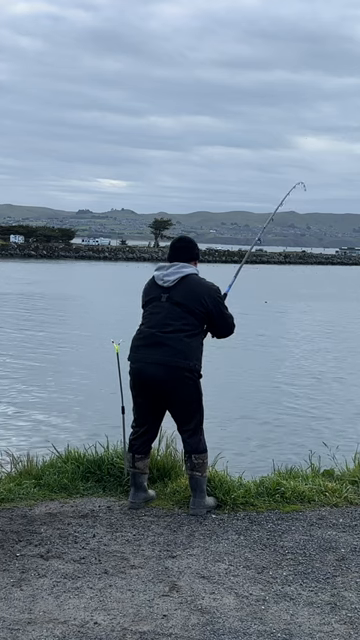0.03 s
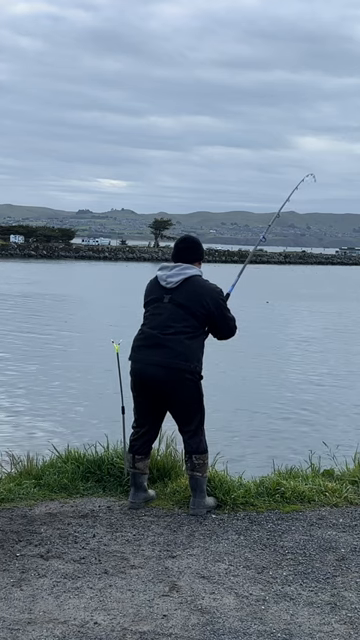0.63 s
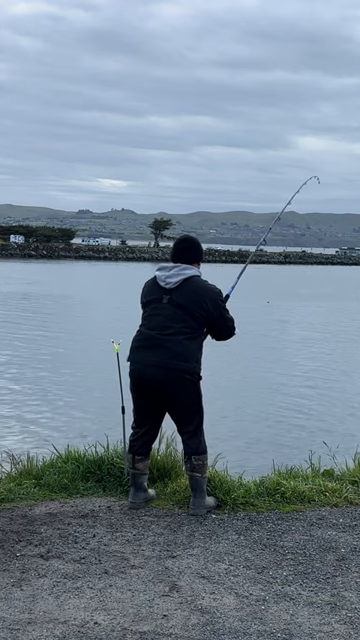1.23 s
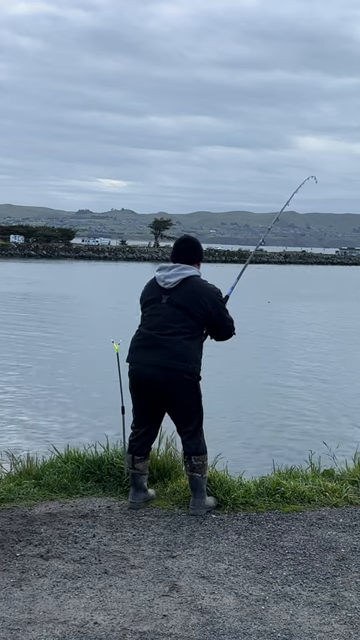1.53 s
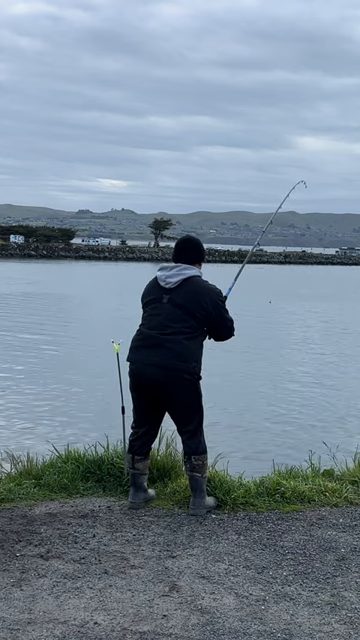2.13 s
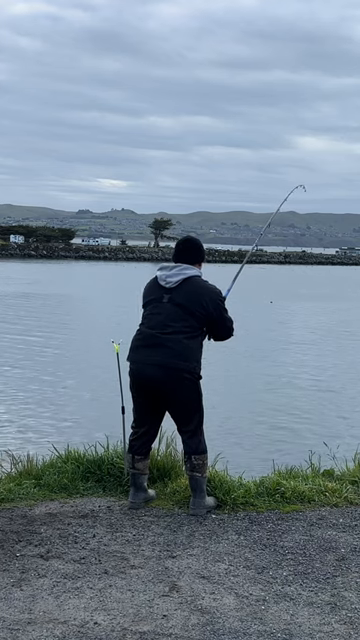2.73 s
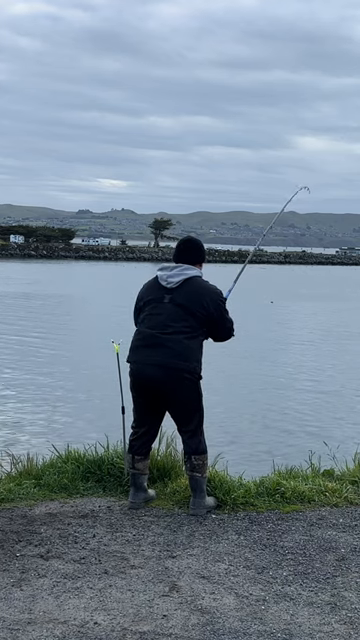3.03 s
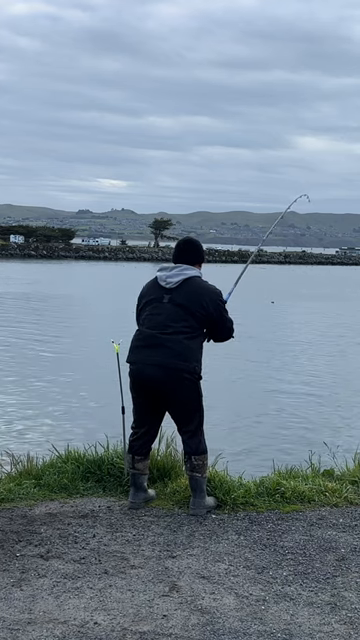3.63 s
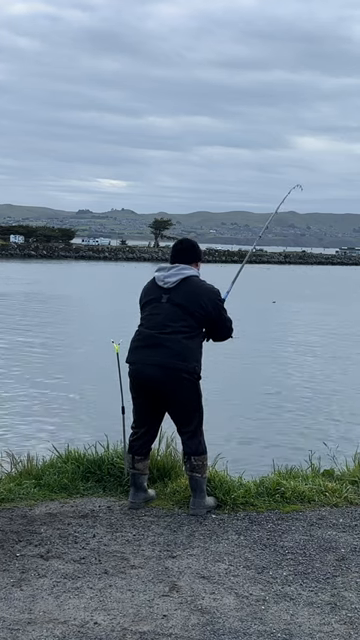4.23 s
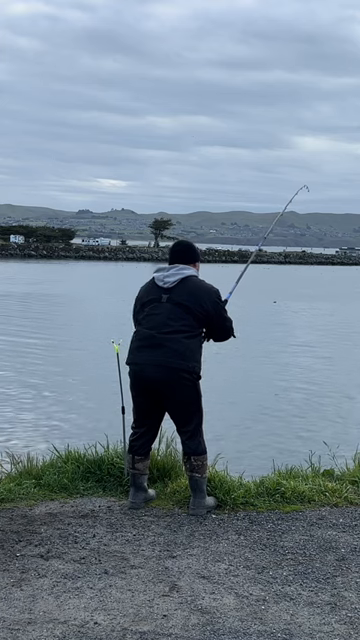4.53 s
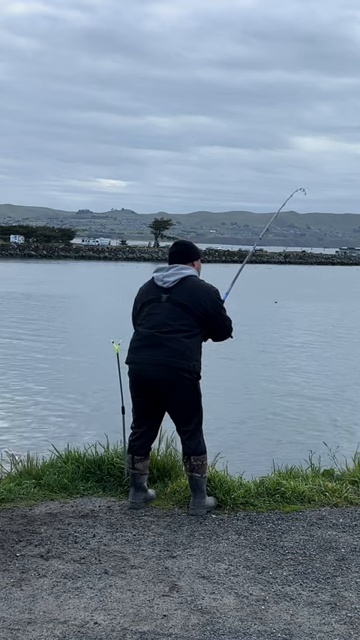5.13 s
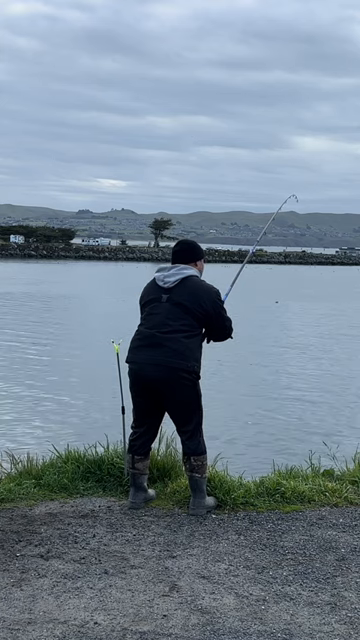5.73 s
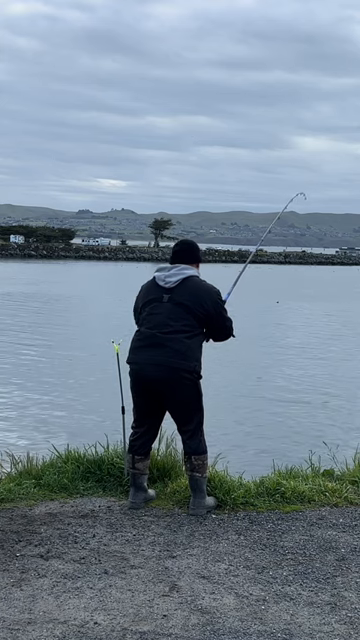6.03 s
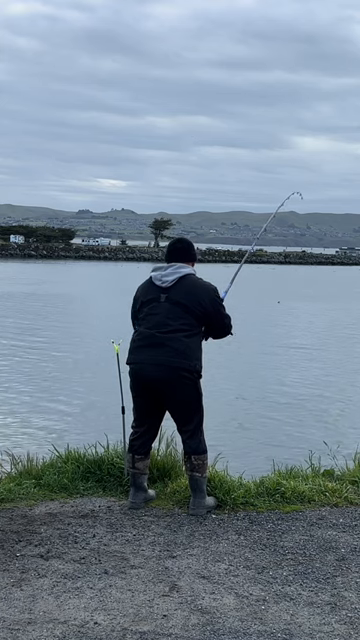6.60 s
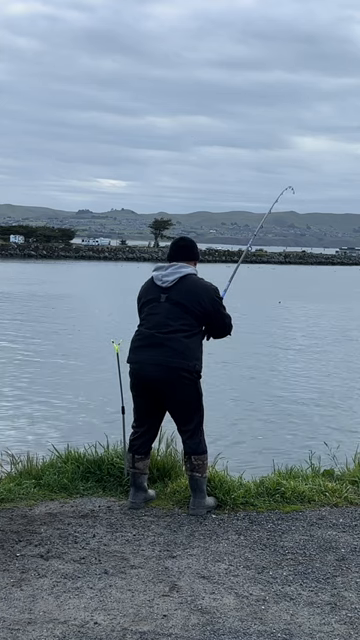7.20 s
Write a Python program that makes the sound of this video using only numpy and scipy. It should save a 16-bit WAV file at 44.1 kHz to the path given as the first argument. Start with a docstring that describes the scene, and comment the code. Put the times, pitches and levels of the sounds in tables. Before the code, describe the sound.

Low wind rumbles on the microphone from the start, over a soft, steady wash of air by open water. Throughout, a fishing reel is wound with a faint gear whine that wavers up and down several times a second, with a few tiny ticks. A faint, distant low moan comes at about 1.2 seconds. Short wind puffs hit between 1.5 and 3 seconds and again near 3.9; the rumble dips around 3.1 and 4.3. At 2.2 seconds a foghorn sounds one prominent, almost pure, medium-pitched tone lasting a second, with a short lingering tail. From 4.5 seconds a sparrow on the left sings two clear notes, then high chips and buzzes from 5 to 6.2, a quick rising trill at 6.4 and a last buzz. The reel's handle knocks lightly near 6.9 seconds, and wind and winding continue until about 7.5.

```python
"""On a grassy shore an angler winds a spinning reel, whose gears whine up and down with each push
of the crank. Wind rumbles and puffs on the microphone, and a foghorn sounds one almost pure tone
across the bay. A sparrow off to the left sings short notes, buzzes and a trill;
other birds call from far away, over the soft wash of the bay."""
import sys
import numpy as np
from scipy import signal
from scipy.fft import rfft, irfft, next_fast_len
from scipy.io import wavfile
from scipy.ndimage import uniform_filter1d, map_coordinates

SR = 44100
rng = np.random.default_rng(int(sys.argv[2]) if len(sys.argv) > 2 else 0)


def wrap_up_sound(samples):
    """Save the sound to the file named by the first command line argument, as 16-bit audio."""
    columns = np.atleast_2d(samples).T
    # keep every value between -1 and 1, then stretch to whole-number steps
    tamed = np.clip(columns, -1, 1)
    steps = np.round(tamed * 32767).astype(np.int16)
    wavfile.write(sys.argv[1], SR, steps)


N = 328986
TIME = np.arange(N) / SR


# Pushes of the crank, two a turn, and how often the gear teeth meet during and after each one.
# Columns: fastest_at_s, fastest_hz, slowest_hz, level_db
CRANK_PUSHES = [(0.011, 515.4, 452, -56.5), (0.115, 494, 419, -60.5), (0.247, 510, 391.7, -59),
                (0.363, 578.4, 460, -60), (0.464, 496, 325.3, -60.5), (0.631, 484, 433.5, -58),
                (0.736, 460.4, 391.6, -62), (0.912, 538, 474, -59.5), (1.004, 576, 439, -59),
                (1.121, 509, 398.7, -59.5), (1.264, 486.7, 460.6, -57), (1.369, 497.4, 410.3, -60.0),
                (1.552, 483, 473, -59.5), (1.639, 578, 387, -59), (1.766, 448.6, 351, -60),
                (1.94, 544.3, 531.5, -61.5), (2.012, 641.6, 407, -60.0), (2.164, 516, 452.3, -59),
                (2.279, 537, 418, -61), (2.401, 481.6, 430, -59), (2.538, 520, 483, -61.5),
                (2.632, 572, 302.2, -61), (2.819, 493.7, 459, -62.5), (2.93, 533.3, 394.3, -63),
                (3.046, 496, 354, -62.5), (3.197, 462.7, 420.4, -62), (3.33, 590.4, 517.3, -62.5),
                (3.412, 550.6, 455, -61), (3.568, 534, 470.5, -63.5), (3.664, 530, 378, -61.5),
                (3.81, 436, 361.5, -63), (3.965, 452.5, 419.5, -63), (4.066, 485, 344, -58.5),
                (4.258, 447.3, 393.3, -65.5), (4.387, 486.4, 372, -64.5), (4.526, 459, 392, -63.5),
                (4.682, 459, 425.7, -68.5), (4.778, 514.6, 349, -64.5), (4.956, 458.6, 389, -67),
                (5.09, 426, 379.6, -64), (5.229, 459, 416, -65), (5.368, 482, 377.4, -64.5),
                (5.527, 488, 481.7, -62), (5.618, 523.7, 424.7, -57.5), (5.767, 485.4, 415.6, -63),
                (5.88, 488, 369, -62), (6.04, 526, 471, -62.5), (6.139, 491, 421, -62),
                (6.27, 551, 415, -59.5), (6.408, 485.5, 400.6, -63.5), (6.547, 477, 369.6, -62),
                (6.674, 488, 409, -64), (6.834, 509, 501.6, -60), (6.917, 576.5, 294.6, -62),
                (7.114, 501.6, 442.6, -62.5), (7.204, 467.4, 369.5, -63.5), (7.368, 462, 410, -59),
                (7.48, 478, 425, -63)]

def crank(unsteady=.007):
    """The gears speed up with each push and slow down halfway to the next; gives their rate and level."""
    fastest_at_s, fastest_hz, slowest_hz, level_db = np.transpose(CRANK_PUSHES)
    half_pushes = np.interp(TIME, fastest_at_s, 2 * np.arange(len(fastest_at_s)))
    eased = np.floor(half_pushes) + (1 - np.cos(np.pi * (half_pushes % 1))) / 2
    turning_points = np.ravel([fastest_hz, slowest_hz], "F")   # fast, slow, fast, slow...
    tooth_hz = np.interp(eased, np.arange(len(turning_points)), turning_points)
    return tooth_hz * (1 + unsteady * drift(22.16)), np.interp(TIME, fastest_at_s, level_db)


# The tones that make up the whine. Columns: multiple_of_tooth_rate, gain_db
GEAR_TONES = [(2, -2.5), (3, -3), (4, -0.5), (5, -12.5), (6, -13.5), (7, -18.5), (8, -14.5)]
# How the reel's housing boosts or weakens each pitch. Columns: pitch_hz, gain_db
HOUSING_COLOUR = [(700, -12.5), (1020, 2), (1250, -4.5), (1460, 4), (1570, 1.5), (1700, 6), (2150, 3.5),
                  (2340, -6.5), (2540, 4), (2690, -11), (2850, 0), (3150, -8.5), (3900, -7.5),
                  (5000, -12.5)]

def gear_whine(tooth_hz, jitter=0.009, rasp=0.0085, rough=0.34, scratch=0.19, even_s=0.1):
    """Meeting teeth make a stack of tones; uneven teeth make each flicker, the strongest one least."""
    chatter = rms_one(band(rng.standard_normal(N), 82, 400))
    phase = 2 * np.pi * np.cumsum(tooth_hz * (1 + jitter * drift(52.9) + rasp * chatter)) / SR
    whine = 0
    for multiple, db in GEAR_TONES:
        from_strongest = abs(multiple - 4)
        flicker_db = (6 if from_strongest else 5) * np.minimum(drift(22), 1)
        level = from_db(db + at_hz(HOUSING_COLOUR, multiple * tooth_hz) + flicker_db)
        blur = scratch * (1 + from_strongest) * drift(88)
        whine = whine + level * (1 + rough * drift(110)) * np.sin(multiple * phase + blur)
    # the tones compete for the power that the push supplies
    return whine / np.sqrt(uniform_filter1d(whine ** 2, int(even_s * SR)) + 1e-12)


# The hiss of the gears and the line rubbing. Columns: pitch_hz, gain_db
RUB_COLOUR = [(500, -16), (1200, 4.5), (2500, 0), (3400, -9), (6000, -38)]

def reel(whine_boost_db=2.0, rub_db=-69.0, rub_follows=0.43, echo_db=-12.0):
    """The gears whine, the rubbing swells with each push, and echoes from the bank smear the sound."""
    tooth_hz, push_db = crank()
    whine = from_db(push_db + whine_boost_db) * gear_whine(tooth_hz)
    load = from_db(rub_follows * (push_db - push_db.mean()))
    rub = rms_one(coloured(banded_noise(RUB_COLOUR, patchy_db=4.5), HOUSING_COLOUR))
    winding = place(whine, lag_ms=0.02, left_db=0.2) + load * from_db(rub_db) * rub
    return winding + from_db(echo_db) * scatter(winding[0], ring_s=0.12, first_s=0.0014)


# Ticks inside the reel. Columns: start_s, level_db
REEL_TICKS = [(0.171, -78.5), (1.2849, -84), (1.3174, -80.5), (2.254, -85), (3.423, -89), (3.962, -84),
              (4.245, -83), (4.7241, -71.5), (6.85, -81.5)]

def reel_ticks(boost_db=13.5, ring_s=0.016, fine_db=-91.5, fine_until_s=4.3, fine_count=30):
    """The mechanism gives tiny bright ticks, and finer ones at random while it is wound hard."""
    ticks, age = np.zeros(N), TIME[:SR // 10]
    fine = [(fine_until_s * when, fine_db + 5 * force) for when, force in rng.random((fine_count, 2))]
    for start_s, db in list(REEL_TICKS) + fine:
        level = from_db(db + boost_db - 60 * age / ring_s)
        ticks[round(start_s * SR):][:len(age)] += level * rng.standard_normal(len(age))
    return band(ticks, low_hz=3500, high_hz=14000)


# Knocks of the reel's handle. Columns: start_s, level_db
HANDLE_KNOCKS = [(4.724, -66.5), (6.848, -51.5), (6.92, -60)]
# The tones the handle rings with. Columns: pitch_hz, gain_db, ring_s (time to fade by 60 dB)
HANDLE_TONES = [(1170, 6.5, 0.0098), (1680, -11, .025), (2850, -8.5, 0.051), (3900, -5.5, 0.029)]

def handle_knocks():
    """Each knock sets the handle ringing for a moment, duller than the ticks."""
    knocks, age = np.zeros(N), TIME[:SR // 10]
    for start_s, db in HANDLE_KNOCKS:
        for hz, gain_db, ring_s in HANDLE_TONES:
            level = from_db(db + gain_db + rng.normal(0, 1.5) - 60 * age / ring_s)
            knocks[round(start_s * SR):][:len(age)] += level * np.sin(2 * np.pi * hz * age)
    return knocks


# How the breeze rises and falls. Columns: time_s, level_db
BREEZE = [(0.0, -51.5), (1.45, -51), (2.4, -52), (2.75, -54.5), (3.15, -65.5), (3.65, -51.5), (4.15, -62.5),
          (4.45, -63.5), (4.8, -52.5), (7.46, -51.5)]
# The wind's low rumble. Columns: pitch_hz, gain_db
RUMBLE_COLOUR = [(20, -41), (32, -31), (45, -10.5), (62, -6), (80, 1), (115, -2.5), (150, -15), (200, -21),
                 (300, -25.5), (500, -40.5)]
# Puffs on the microphone. Columns: middle_s, length_s, level_db, top_hz
WIND_PUFFS = [(1.549, 0.055, -40, 131), (1.691, 0.11, -39.5, 144), (2.044, 0.024, -32, 183),
              (2.091, 0.49, -42.5, 162), (2.599, 0.091, -37, 231), (2.9, 0.2, -49.5, 241),
              (3.876, 0.073, -44, 162), (3.953, 0.019, -39, 260)]

def wind(rumble_gain_db=1.5, drone_gain_db=-1.5):
    """A low rumble with a droning centre follows the breeze, and short puffs hit the microphone."""
    eddies = rng.standard_normal(N) + .33 * rng.standard_normal((2, N))   # mostly alike on both sides
    drone = from_db(drone_gain_db) * rms_one(band(eddies, 56.05, 65.8))
    rumble = from_db(rumble_gain_db) * banded_noise(RUMBLE_COLOUR, patchy_db=2.0)
    breeze_db = np.interp(TIME, *np.transpose(BREEZE))
    out = from_db(breeze_db) * (rumble + drone)
    for middle_s, length_s, db, top_hz in WIND_PUFFS:
        shape = swell(middle_s - length_s / 2, length_s, length_s / 3)
        puff = rms_one(shape * band(band(eddies, 29, top_hz), 29, top_hz))
        out += from_db(db) * np.sqrt(np.mean(shape ** 2)) * puff
    return out


def foghorn(start_s=2.212, length_s=1.032, pitch_hz=418.2, level_db=-38.5, tail_db=-12, ring_s=.65):
    """One blast of an almost pure tone, which lingers over the water."""
    flat_hz = 70 * np.exp(-np.maximum(TIME - start_s, 0) / 0.01)   # it starts a little low
    phase = 2 * np.pi * np.cumsum(pitch_hz - flat_hz) / SR
    blast = swell(start_s, length_s, fade_s=0.021)
    since_end = np.maximum(TIME - start_s - length_s, 0)
    dying = from_db(tail_db - 60 * since_end / ring_s + 2.0 * drift(8))
    tail = swell(start_s, 2 * length_s, fade_s=.05) * dying
    level = from_db(level_db + 0.54 * drift(2.6)) * np.maximum(blast, tail)
    return place(np.sqrt(2) * level * np.sin(phase), lag_ms=.17, left_db=.5)


# The sparrow's pure notes. Columns: start_s, length_s, first_hz, middle_hz, last_hz, level_db, fade_s
SPARROW_NOTES = [ (4.522, 0.076, 3235, 3148, 3270, -59, 0.022),
                 (4.834, 0.08, 3300, 3076, 3220, -52.5, 0.032), (5.044, 0.078, 4800, 5386, 4350, -70, 0.01),
                 (5.153, 0.016, 5900, 6896, 7300, -65, 0.0036),
                 (5.158, 0.011, 4783, 5700, 6440, -67, 0.0035),
                 (5.167, 0.037, 6480, 6350, 6840, -48, 0.0087),
                 (5.837, 0.0095, 5270, 6370, 7700, -69, 0.0026),
                 (5.857, 0.0091, 4876, 6756, 9310, -58, 0.0059),
                 (6.163, 0.055, 8150, 7750, 7604, -60, 0.025), (6.2, 0.05, 7560, 7210, 7130, -52.5, 0.013)]

def sparrow_notes():
    """The sparrow whistles short, clear notes that slide in pitch."""
    return whistles(SPARROW_NOTES)


# The sparrow's buzzes.
# Columns: start_s, length_s, first_hz, middle_hz, last_hz, level_db, fade_s, flutter_hz, swing_hz
SPARROW_BUZZES = [ (5.055, 0.049, 3675, 3720, 3570, -65, 0.015, 402, 168),
                  (5.228, 0.15, 5080, 5020, 5320, -57, 0.04, 350, 1460),
                  (5.232, 0.14, 3550, 3650, 3800, -74, 0.022, 350, 300),
                  (5.355, 0.11, 5430, 5420, 5480, -64.5, 0.018, 324, 496.3),
                  (5.450, 0.34, 5430, 5440, 5520, -62.5, 0.024, 328.6, 1213),
                  (5.888, 0.185, 4902, 4760, 4625, -59, 0.043, 303.2, 350),
                  (5.915, 0.11, 4960, 4950, 4970, -63, 0.023, 60, 750),
                  (6.655, 0.12, 3660, 3675, 3620, -64, 0.027, 233.2, 460),
                  (6.670, 0.082, 5270, 5380, 5330, -72.5, 0.022, 221, 670)]

def sparrow_buzzes(unsteady=0.018, rasp=0.36, pulsing=0.57, limp=0.19, throat=0.64, held_gain=0.46):
    """One side of the bird's voice box flutters the pitch up and down; the other holds the centre."""
    out, wander, grain = np.zeros(N), drift(44), drift(199)
    for *row, flutter_hz, swing_hz in SPARROW_BUZZES:
        span, glide_hz, level = note(*row)
        cycle = 2 * np.pi * np.cumsum(flutter_hz * (1 + unsteady * wander[span])) / SR
        sweep = np.sin(cycle) + rasp * grain[span]
        # loudest where the sweep crosses the pitch at which the throat rings
        swept = tone(glide_hz + swing_hz * sweep) / np.sqrt(1 + (sweep / throat) ** 2)
        held = tone(glide_hz + 90 * grain[span])
        pulses = (1 - pulsing * np.cos(cycle)) * (1 + limp * np.sin(cycle / 2))   # strong, weak in turn
        out[span] += level * pulses * (swept + held_gain * held)
    return out


def sparrow_trill(start_s=6.399, step_s=.0189, count=10, pitch_hz=4960, rise_hz_per_s=3540):
    """One short falling chirp, repeated on a rising pitch; the run swells quickly and then fades."""
    top_db, top_at_s, swell_db_per_s, fade_db_per_s = -41.5, 0.026, 471, 72
    half_chirp_s, fall_hz, ripple_hz, ripples_per_s = .0102, 430, 90, 170
    out = np.zeros(N)
    progress = np.linspace(-1, 1, int(2 * half_chirp_s * SR))
    for age in step_s * np.arange(count):
        past_top = age - top_at_s
        db = top_db + min(swell_db_per_s * past_top, -fade_db_per_s * past_top)
        ripple = np.sin(2 * np.pi * (ripples_per_s * half_chirp_s * progress + rng.random()))
        hz = pitch_hz + rise_hz_per_s * age - fall_hz * progress + ripple_hz * ripple
        level = from_db(db + 1.8 * ripple) * np.cos(np.pi * progress / 2) ** 2
        out[int((start_s + age - half_chirp_s) * SR):][:len(progress)] += level * tone(hz)
    return out


# A far bird's long whistle, and a faint moan from across the water.
# Columns: start_s, length_s, first_hz, middle_hz, last_hz, level_db, fade_s
FAR_WHISTLE = [(5.93, 0.52, 2712, 2706, 2705, -80, 0.022)]
FAR_MOAN = [(1.14, 0.3, 464, 517.4, 550, -67, 0.063), (1.37, 0.19, 343.5, 322.6, 320, -63.5, 0.06)]

def far_calls():
    """Pure tones carry from far away, one high and two low."""
    return whistles(FAR_WHISTLE) + whistles(FAR_MOAN)


# Faint bird chips. Columns: start_s, length_s, first_hz, middle_hz, last_hz, level_db, fade_s
BIRD_CHIPS = [(.265, 0.053, 5500, 4900, 4350, -76.5, 0.014), (.97, 0.027, 5800, 5266, 4800, -78, 0.013)]

def faint_chips():
    """Quick falling notes with a shaky pitch."""
    return whistles(BIRD_CHIPS, quiver=0.058)


# The microphone's body shades its right side from the sparrow's high notes.
# Columns: pitch_hz, left_minus_right_db
MIC_SHADE = [(3100, -2.5), (4300, 2), (5400, 10.5), (7500, 8.5)]

def birds(pure_echo_db=-10.5, buzz_echo_db=-3.5, far_echo_db=-1.5, bank_s=0.12, bank_db=-24.0):
    """The sparrow sits to the left; the ground adds a close echo, the bank a late dull one."""
    pure = sparrow_notes() + sparrow_trill()
    buzzes = sparrow_buzzes()
    far = far_calls()
    sparrow = pure + buzzes
    sparrow += 0.48 * delayed(sparrow, lag_ms=2.2)   # bounce off the ground
    bank = from_db(bank_db) * band(np.interp(TIME - bank_s, TIME, sparrow), 2000, 5400)
    left, right = place(sparrow, lag_ms=.335, left_db=0.5)
    near = np.array([coloured(left, MIC_SHADE, power=0.41), coloured(right, MIC_SHADE, power=-0.47)])
    distant = place(far + bank + faint_chips(), lag_ms=0.041, left_db=1.0)
    echoing = from_db(pure_echo_db) * pure + from_db(buzz_echo_db) * buzzes + from_db(far_echo_db) * far
    return near + distant + scatter(echoing, ring_s=0.59, first_s=0.0019)


# The air over the bay. Columns: pitch_hz, gain_db
AIR_COLOUR = [(40, -12.5), (100, -2), (200, 6), (330, -0.5), (500, -0.5), (800, -2), (1300, -10),
              (2000, -13.5), (3000, -22), (5000, -36), (8500, -34.5), (12000, -53.5), (15000, -56)]

def bay_air(level_db=-60):
    """A soft, nearly steady wash of noise lies behind everything."""
    return from_db(level_db) * banded_noise(AIR_COLOUR, patchy_db=.6)


# How alike noise is on the left and right. Columns: pitch_hz, likeness (1 means the same)
SIDE_LIKENESS = [(60, 1), (250, 0.87), (450, .65), (700, 0.07), (1100, 0.17), (1800, 0.6), (3000, 0.099),
                 (5000, 0.76), (9000, .2)]

def banded_noise(spectrum, patchy_db):
    """Stereo noise in half-octave bands, each with its own level, flicker and left-right likeness."""
    out, edges = 0, 22 * 2 ** (np.arange(20) / 2)
    white = rng.standard_normal((2, 2, N))
    for k, (low, high) in enumerate(zip(edges, edges[1:])):
        hz = np.sqrt(low * high)
        if spectrum[0][0] / 2 < hz < spectrum[-1][0] * 2:
            mid, side = band(white[k % 2], low, high)
            alike = at_hz(SIDE_LIKENESS, hz)
            gain = from_db(at_hz(spectrum, hz) + patchy_db * drift(9.1))
            out = out + gain * (np.sqrt(1 + alike) * mid + np.sqrt(1 - alike) * side * [[1], [-1]])
    return rms_one(out)


def note(start_s, length_s, first_hz, middle_hz, last_hz, level_db, fade_s):
    """The samples one note covers, its curved pitch and its loudness."""
    span = slice(int(start_s * SR), int((start_s + length_s) * SR))
    progress = np.linspace(-1, 1, len(TIME[span]))
    bend_hz = (first_hz + last_hz) / 2 - middle_hz
    glide_hz = middle_hz + (last_hz - first_hz) / 2 * progress + bend_hz * progress ** 2
    return span, glide_hz, np.sqrt(2) * from_db(level_db) * swell(start_s, length_s, fade_s)[span]


def whistles(table, quiver=0.00087):
    """Play each row as one sliding pure tone."""
    out, wander = np.zeros(N), drift(60)
    for row in table:
        span, glide_hz, level = note(*row)
        out[span] += level * tone(glide_hz * (1 + quiver * wander[span]))
    return out


def tone(hz):
    """A sine wave that follows a changing pitch."""
    return np.sin(2 * np.pi * np.cumsum(hz) / SR)


def swell(start_s, length_s, fade_s):
    """Fade smoothly in, hold, and fade out."""
    edge = np.clip(np.minimum(TIME - start_s, start_s + length_s - TIME) / fade_s, 0, 1)
    return edge * edge * (3 - 2 * edge)


def drift(rate_hz):
    """A smooth random wobble, about 1 in size."""
    keep = np.exp(-80 * np.pi * rate_hz / SR)
    slow = signal.lfilter([1], [1, -2 * keep, keep * keep], rng.standard_normal(N // 40 + 2002))[2000:]
    return np.interp(np.arange(N) / 40, np.arange(len(slow)), rms_one(slow))


def scatter(x, ring_s, first_s):
    """Countless weak echoes from the bank and the water die away, different on each side."""
    age = TIME[:SR]
    echoes = rng.standard_normal((2, SR)) * from_db(-60 * age / ring_s) * (age > first_s)
    echoes /= np.sqrt(np.sum(echoes ** 2, axis=1, keepdims=True))
    return signal.fftconvolve([x, x], echoes, axes=1)[:, :N]


def delayed(x, lag_ms):
    """The same sound, a little later."""
    return map_coordinates(x, [np.arange(N) - lag_ms * SR / 1000], order=3)


def place(x, lag_ms, left_db):
    """A sound from the left reaches the right side later and weaker."""
    return np.array([x * from_db(left_db / 2), delayed(x, lag_ms) * from_db(-left_db / 2)])


def band(x, low_hz, high_hz):
    """Let through the pitches between two limits."""
    sos = signal.butter(2, [low_hz, min(high_hz, SR / 2 - 1000)], "band", fs=SR, output="sos")
    return signal.sosfilt(sos, x + 1e-18)


def coloured(x, spectrum, power=1):
    """Boost or weaken each pitch by a table's decibels, times power."""
    size = next_fast_len(N + SR // 10)
    hz = np.maximum(np.arange(size // 2 + 1) * SR / size, 1)
    return irfft(rfft(x, size) * from_db(power * at_hz(spectrum, hz)), size)[..., :N]


def at_hz(table, hz):
    """Read a table's value at any pitch."""
    pitches, values = np.transpose(table)
    return np.interp(np.log(hz), np.log(pitches), values)


def from_db(db):
    """Turn decibels into a multiplier."""
    return 10 ** (np.asarray(db) / 20)


def rms_one(x):
    """Scale to an average power of 1."""
    return x / np.sqrt(np.mean(x ** 2) + 1e-20)


def scene():
    """Everything on the shore, added together."""
    return bay_air() + reel() + wind() + foghorn() + birds() + reel_ticks() + handle_knocks()


def record(dry, low_hz=31, high_hz=15800):
    """The microphone drops the deepest rumble, and the highest treble is cut steeply."""
    thinned = signal.sosfilt(signal.butter(3, low_hz, "high", fs=SR, output="sos"), dry)
    return signal.sosfilt(signal.ellip(10, .1, 80, high_hz, fs=SR, output="sos"), thinned)


dry = scene()
out = record(dry)
wrap_up_sound(out)
```